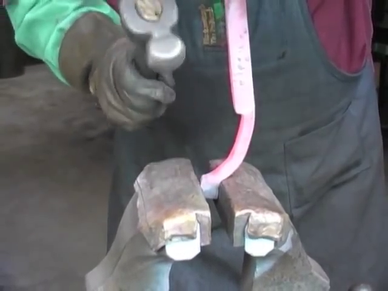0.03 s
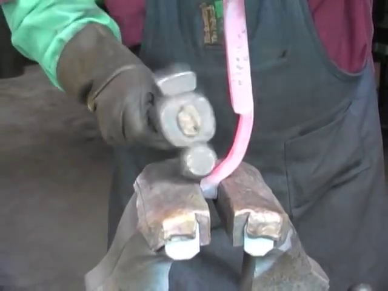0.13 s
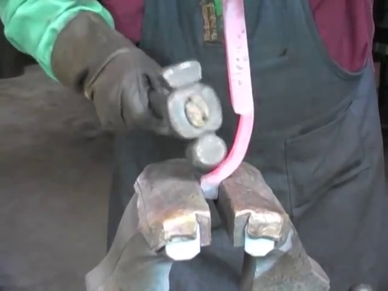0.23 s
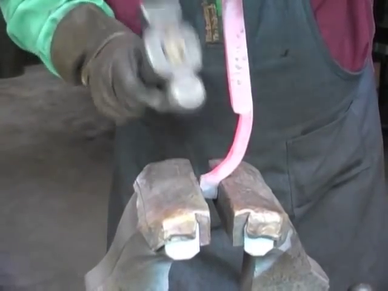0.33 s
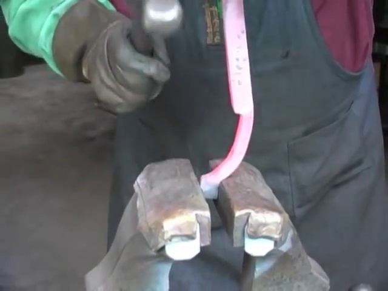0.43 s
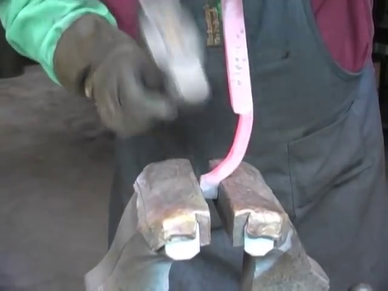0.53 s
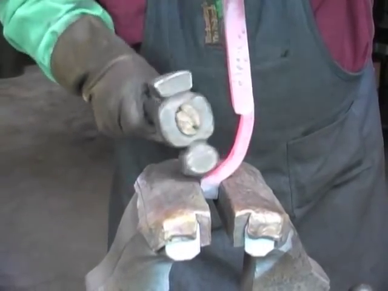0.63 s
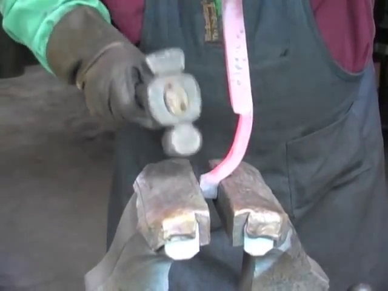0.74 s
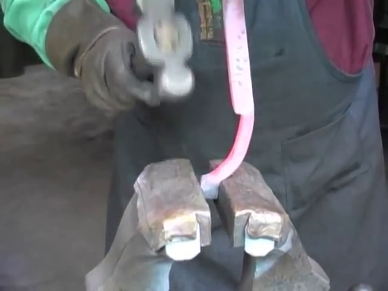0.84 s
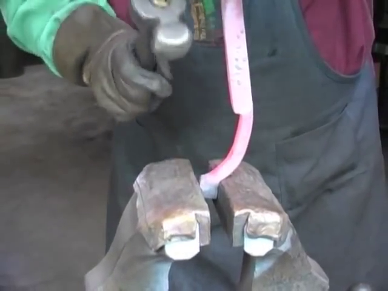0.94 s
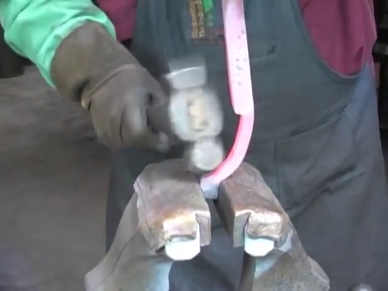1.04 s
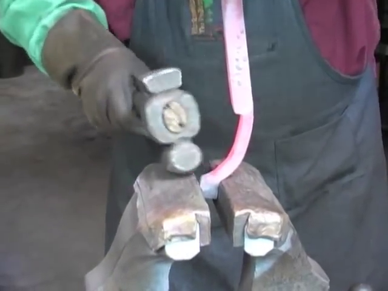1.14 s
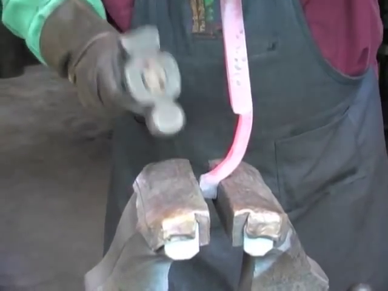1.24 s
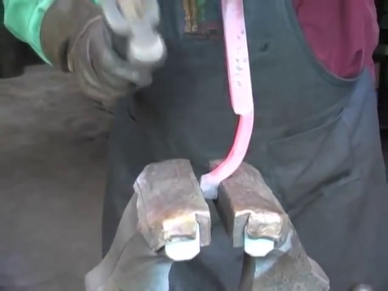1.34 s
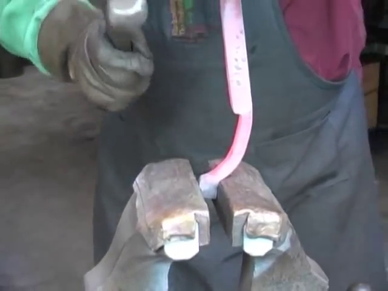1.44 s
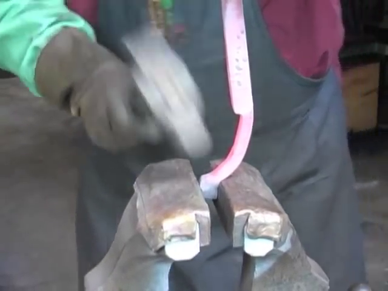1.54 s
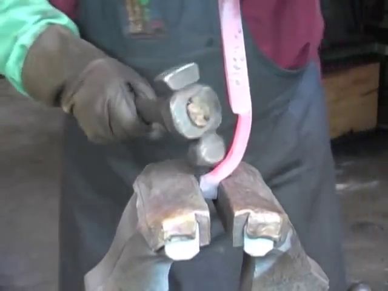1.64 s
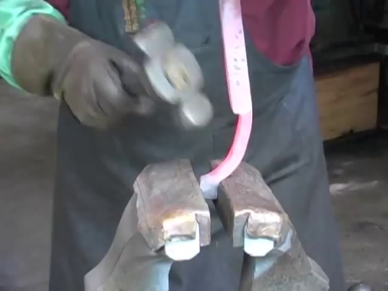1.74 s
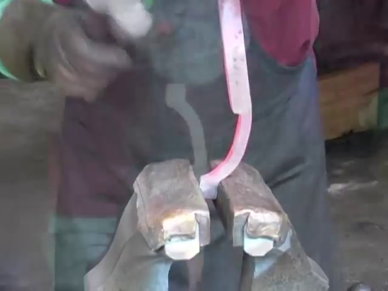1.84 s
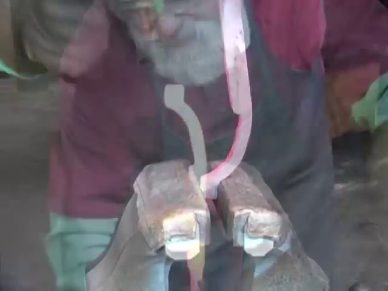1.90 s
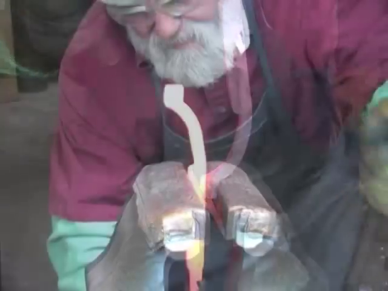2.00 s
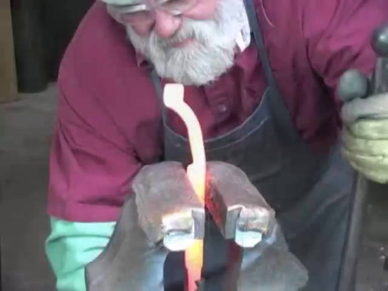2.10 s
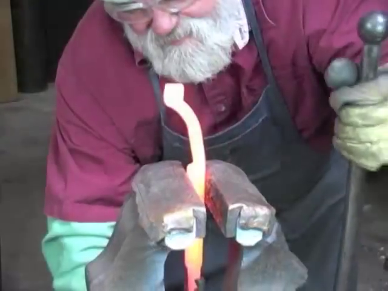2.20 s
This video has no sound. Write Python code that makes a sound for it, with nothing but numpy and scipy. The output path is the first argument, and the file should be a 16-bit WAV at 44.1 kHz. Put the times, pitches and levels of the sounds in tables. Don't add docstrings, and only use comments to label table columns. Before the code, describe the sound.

Four sharp hammer blows ring on hot steel clamped in a vise, close up in a workshop

```python
import sys
import numpy as np
from scipy import signal
from scipy.fft import rfft, irfft
from scipy.io import wavfile
from scipy.ndimage import uniform_filter1d

SR = 44100
rng = np.random.default_rng(int(sys.argv[2]) if len(sys.argv) > 2 else 0)


def dump(signal):
    limited = np.clip(np.atleast_2d(signal).T, -1, 1)
    pcm = np.round(limited * 32767).astype(np.int16)
    wavfile.write(sys.argv[1], SR, pcm)


def gain_from_decibels(decibels):
    exponent = np.asarray(decibels, float) / 20
    return 10 ** exponent


N = 101430
LEAD = 16384

# (time [s], peak level [dB], clatter length [s], thud level [dB], brightness [dB/octave])
BLOWS = [
    (0.2116, -15.5, .006, -33, -0.35),
    (0.6493, -19, .005, -23.5, -1),
    (1.1135, -16.5, .006, -28, -1.07),
    (1.6304, -14.5, .010, -29, -0.84),
    (2.2256, -37, 0.021, -33.5, -1),
    (2.2357, -46, .006, -27, -2.5),
]
# (time [s], level [dB], length [s], thud [dB], brightness [dB/octave])
EARLIER_BLOW = (-0.2331, -9, 3.5, -33.5, 0.1)
STEEL_HZ = [1692, 1745, 2905, 3030, 3911, 4743, 6065, 6261, 6584, 7605, 8016, 9012, 10788, 12600]
# (t60 [s], blow 1 [dB], blow 2 [dB], blow 3 [dB], blow 4 [dB])
STEEL_RING = [(0.15, -3.5, 0, -1, -11), (0.46, -10.5, -14.5, -11, -13.5), (.18, 0, -28, -26.5, -28.5),
              (0.26, -4.5, -9, -2.5, -4), (0.11, -4, -3.5, 6, -15), (0.32, -16, -8, -5, -3),
              (.18, -4.5, -1, -27, -20), (0.28, -1.5, -9, -7.5, -11.5), (0.06, -3, -17.5, -26, -14.5),
              (0.19, 2.5, -9, -10.5, -5.5), (.15, -11, -7.5, -20, -9.5), (0.39, -7.5, -18.5, -26, -16.5),
              (0.17, -28.5, 2.5, -1, -7), (0.22, -10, -2.5, -20, -8.5)]
# (frequency [Hz], level [dB], t60 [s])
HANDLE_RING = [(3031, 4, .12), (4500, 1, .06), (6099, 6, .1), (6912, 0, .1), (8000, 3, .07), (9012, 1, .08),
               (11460, 3, .05)]
RING_DB, RING_SHORTEN, RING_ECHO_DB, HANDLE_ECHO_DB = -16.5, .45, -5, -5

# (frequency [Hz], density [dB per Hz])
CLATTER = [(200, -22.5), (800, -15.5), (1700, -13.5), (3000, -10), (5200, -6.5), (7000, -1.5), (12500, -12),
           (14500, -15.5)]
CLATTER_T60_S, CLATTER_T60_SLOPE = 0.031, -0.26
CLATTER_APART_DB, APART_HZ = -20.5, 10000
RATTLE_DB, RISE_S, EVEN_BINS = 2, .0006, 23

# (frequency [Hz], level [dB], t60 [s])
THUD = [(55, -17.5, 0.055), (91, -1.5, .1), (178, 1.1, .13), (234, -7, 0.25), (333, -10.5, 0.19),
        (530, -8, 0.04)]
THUD_RISE_S, THUD_RIGHT_DB, THUD_LAG_S = .005, 2.5, .0007

# (frequency [Hz], t60 [s], level [dB])
ROOM = [(150, .5, -17), (400, 0.92, -9.5), (920, 0.44, -4.5), (1800, 0.55, -1), (3516, 0.52, -10),
        (6500, 0.41, -9.5), (12890, 0.27, -12)]
ROOM_ONSET_S, ROOM_ALIKE = 0.004, 0.49

# (frequency [Hz], width [Hz], level [dB])
RUMBLE = [(77, 17, -10), (163.9, 24, -3.5), (231.8, 29, -3), (265.6, 88, -4.5), (362, 33, -6.5),
          (385.7, 40, -9.5), (458.2, 35, -9.5)]
RUMBLE_DB, RUMBLE_LAG_S, RUMBLE_APART_DB, RUMBLE_FLICKER_DB = -67, .00018, -18.5, .7
WHINE_HZ, WHINE_DB, WHINE_WANDER_HZ, WHINE_PHASE = 2478, -81, 2.0, 1.3

# (frequency [Hz], density [dB per Hz])
HISS = [(12, -15.5), (60, -26.5), (130, -5.5), (450, -17.5), (750, -20.5), (2500, -23.5), (12400, -32.5),
        (15000, -23.5)]
HISS_DB, HISS_ALIKE_HZ = -70.5, 1494
# (time [s], rumble [dB], hiss [dB], deepest resonance [dB])
SCENE_CHANGE = [
    (1.551, 3.5, 4.5, -0.5),
    (1.95, -2, 0.5, -6),
    (2.149, -1.5, 0.5, -3),
    (2.3, 3.5, -2.5, -15),
]

RIGHT_DB, PORT_PHASE, PORT_PHASE_HZ, LEFT_SHADOW_DB = 4, 0.32, 4000, 2.5
PEAK_CEILING, TOP_HZ, TOP_DROP_DB = .3, 14550, -40


def hammering():
    steel = np.zeros((2, LEAD + N + SR))
    bench, send = np.zeros((2, LEAD + N + SR))
    table = np.array(STEEL_RING).T
    rings = [np.array([STEEL_HZ, table[k], table[0]]).T for k in (2, 1, 2, 3, 4)]
    rings += [HANDLE_RING] * 2
    for contact, modes in zip([EARLIER_BLOW] + list(BLOWS), rings):
        time_s, db, length_s, thud_db, tilt_db = contact
        near, thud, around = blow(length_s, thud_db, tilt_db, modes)
        start = LEAD + int(time_s * SR)
        span = slice(start, start + len(thud))
        echo_db = HANDLE_ECHO_DB if modes is HANDLE_RING else 0
        steel[:, span] += gain_from_decibels(db) * near
        bench[span] += gain_from_decibels(db) * thud
        send[span] += gain_from_decibels(db + echo_db) * (around + thud)
    return steel, bench, send


def blow(length_s, thud_db, tilt_db, modes):
    t = np.arange(SR // 3) / SR
    rise = 1 - np.exp(-(t / RISE_S) ** 2)
    clatter = jaw_clatter(t[:8192], rise[:8192], length_s, tilt_db)
    hz, db, t60 = np.array(modes).T
    phase = 2 * np.pi * rng.random(len(hz))
    rings = rise * ring(hz, gain_from_decibels(db + RING_DB), RING_SHORTEN * t60, phase, t)
    near = np.array([rings, rings])
    around = rings * gain_from_decibels(RING_ECHO_DB)
    near[:, :8192] += clatter
    around[:8192] += clatter[0]
    return near, bench_thud(t, thud_db), around


def jaw_clatter(t, rise, length_s, tilt_db):
    noise = rng.standard_normal((3, len(t)))
    clatter = 0
    for hz in 250 * 2 ** np.arange(0, 6.1, .5):
        shared, left, right = band(noise, hz, hz / 1.6)
        apart = gain_from_decibels(CLATTER_APART_DB) * (1 + (hz / APART_HZ) ** 2)
        pair = shared + apart * np.array([left, right])
        t60 = CLATTER_T60_S * (hz / 4000) ** CLATTER_T60_SLOPE
        clatter = clatter + pair * 1000. ** (-t / t60)
    rattle = gain_from_decibels(RATTLE_DB * uniform_filter1d(rng.standard_normal(len(t)), size=9) * 3)
    fade = (1 + (t / max(length_s, .001)) ** 2) ** 0.34
    clatter = clatter * rattle * rise / fade
    clatter = evened(clatter, lambda f: on_log(f, CLATTER) + tilt_db * np.log2((f + 1) / 4000))
    onset_rms = np.sqrt(np.mean(clatter[:, :256] ** 2))
    return clatter * np.sqrt(rise) * (t < .12) / onset_rms / 3


def bench_thud(t, thud_db):
    hz, db, t60 = np.array(THUD).T
    retuned = hz * (.97 + .06 * rng.random(len(hz)))
    thud = ring(retuned, gain_from_decibels(db + thud_db), t60, 0 * hz, t)
    return thud * (1 - np.exp(-(t / THUD_RISE_S) ** 2))


def workshop(send):
    t = np.arange(32768) / SR
    response = 0
    for hz in 90 * 2 ** np.arange(0, 7.6, .5):
        shared, left, right = band(rng.standard_normal((3, len(t))), hz, hz / 1.6)
        pair = np.sqrt(ROOM_ALIKE) * shared + np.sqrt(1 - ROOM_ALIKE) * np.array([left, right])
        decay = 1000. ** (-t / on_log(hz, ROOM))
        response = response + pair * gain_from_decibels(on_log(hz, ROOM, col=2)) * decay
    response = response * (1 - np.exp(-t / ROOM_ONSET_S)) / 30
    return signal.fftconvolve(send[None], response, axes=1)


def blower_rumble(deep_db):
    parts = []
    for hz, width, db in RUMBLE:
        flicker = gain_from_decibels(db + RUMBLE_FLICKER_DB * walk(15))
        parts.append(flicker * band(rng.standard_normal((3, N)), hz, 1.04 * width) / np.sqrt(width))
    out = parts[0] * gain_from_decibels(deep_db) + sum(parts[1:])
    late = shaped(out[0], lambda f: np.exp(-2j * np.pi * f * RUMBLE_LAG_S))
    pair = np.array([out[0], late]) + gain_from_decibels(RUMBLE_APART_DB) * out[1:]
    return level(pair, RUMBLE_DB)


def blower_whine():
    phase = 2 * np.pi * np.cumsum(WHINE_HZ + WHINE_WANDER_HZ * walk(18)) / SR
    return np.sin(phase + np.array([[WHINE_PHASE], [0]])) * gain_from_decibels(WHINE_DB + 4 + 2.4 * walk(42))


def hiss():
    shared, left, right = rng.standard_normal((3, N))

    def alike(f):
        return 1 / (1 + f / HISS_ALIKE_HZ)

    common = shaped(shared, lambda f: np.sqrt(alike(f)))
    separate = shaped(np.array([left, right]), lambda f: np.sqrt(1 - alike(f)))
    return level(shaped(common + separate, lambda f: gain_from_decibels(on_log(f, HISS))), HISS_DB)


def level(x, db):
    return x * gain_from_decibels(db) / np.sqrt(np.mean(x ** 2))


def on_log(hz, table, col=1):
    table = np.array(table)
    return np.interp(np.log(hz + 1), np.log(table[:, 0]), table[:, col])


def shaped(x, gain):
    n = x.shape[-1]
    return irfft(rfft(x) * gain(np.arange(n // 2 + 1) * SR / n), n)


def band(x, hz, width):
    return shaped(x, lambda f: 1 / (1 + 1j * (f - hz ** 2 / (f + 1)) / width) ** 2)


def walk(rate):
    k = int(SR / rate)
    held = np.repeat(rng.standard_normal(N // k + 1), k)
    return 1.3 * uniform_filter1d(uniform_filter1d(held, k), k)[:N]


def ring(hz, gain, t60, phase, t):
    tones = np.sin(2 * np.pi * hz[:, None] * t + phase[:, None])
    return (gain[:, None] * tones * 1000. ** (-t / t60[:, None])).sum(0)


def evened(x, colour_db):
    spectrum = rfft(x)
    power = uniform_filter1d((np.abs(spectrum) ** 2).mean(0), size=EVEN_BINS) + 1e-18
    hz = np.arange(len(power)) * SR / x.shape[-1]
    return irfft(spectrum * gain_from_decibels(colour_db(hz)) / np.sqrt(power), x.shape[-1])


def left_port(f):
    lead = PORT_PHASE / (1 + (f / PORT_PHASE_HZ) ** 2)
    treble = (f / 12000) ** 4
    return np.exp(1j * lead) * gain_from_decibels(-LEFT_SHADOW_DB * treble / (1 + treble))


def scene():
    t = np.arange(N) / SR
    steel, bench, send = hammering()
    direct = np.array([shaped(steel[0], left_port), steel[1]])
    thud = np.array([bench * gain_from_decibels(-THUD_RIGHT_DB), np.roll(bench, int(THUD_LAG_S * SR))])
    blows = (direct + thud)[:, LEAD:LEAD + N] + workshop(send)[:, LEAD:LEAD + N]
    times, *levels = np.array(SCENE_CHANGE).T
    rumble_db, hiss_db, deep_db = [np.interp(t, times, db) for db in levels]
    under = blower_rumble(deep_db) * gain_from_decibels(rumble_db) + blower_whine() + hiss() * gain_from_decibels(hiss_db)
    return (blows + under) * gain_from_decibels(np.array([[-RIGHT_DB], [RIGHT_DB]]) / 2)


def band_limit(x):
    return signal.sosfilt(signal.butter(12, 16010, fs=SR, output="sos"), x)


def record(dry):
    rounded = PEAK_CEILING * np.tanh(dry / PEAK_CEILING)
    dull = shaped(rounded, lambda f: gain_from_decibels(TOP_DROP_DB / (1 + (TOP_HZ / (f + 1)) ** 60)))
    return band_limit(dull)


dry = scene()
out = record(dry)
dump(out)
```